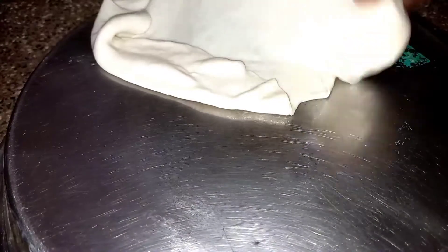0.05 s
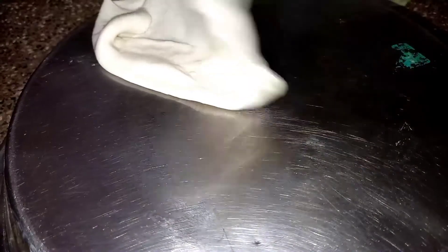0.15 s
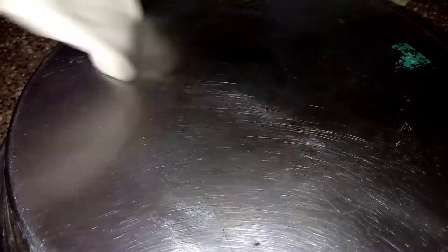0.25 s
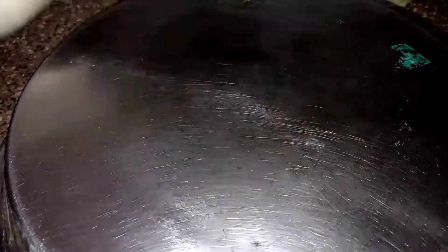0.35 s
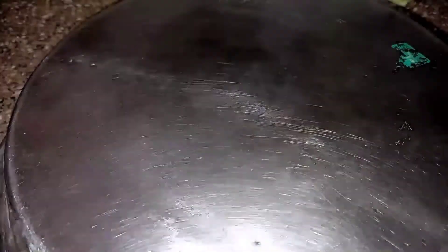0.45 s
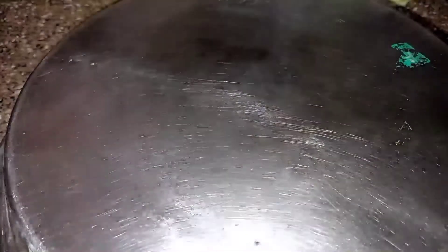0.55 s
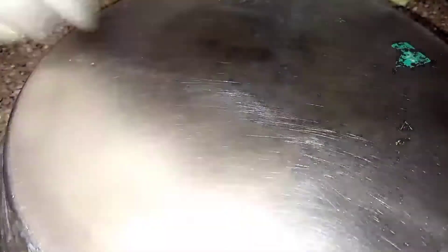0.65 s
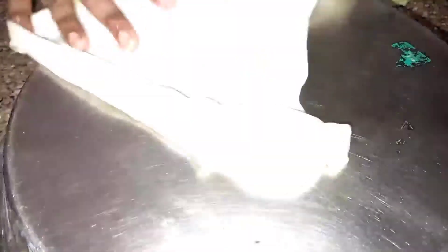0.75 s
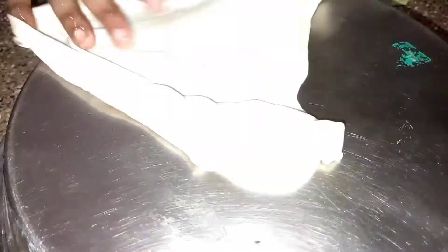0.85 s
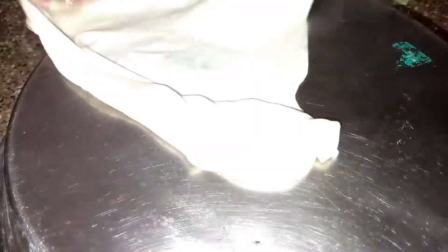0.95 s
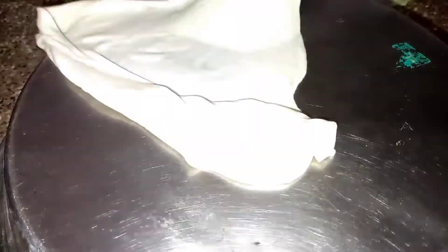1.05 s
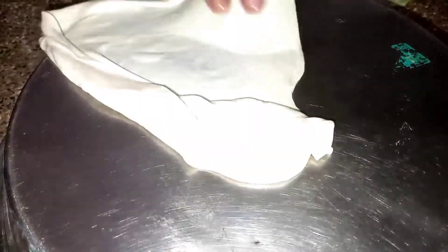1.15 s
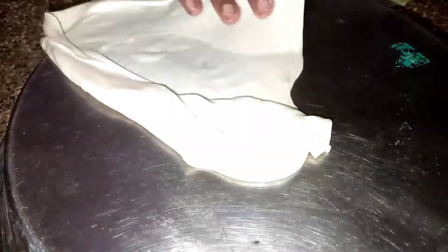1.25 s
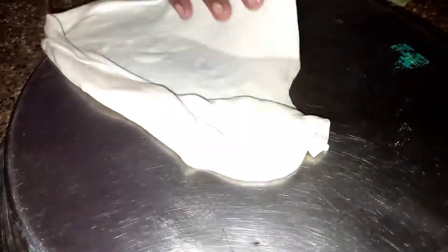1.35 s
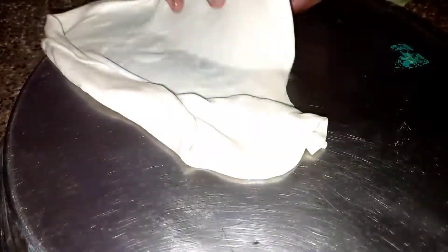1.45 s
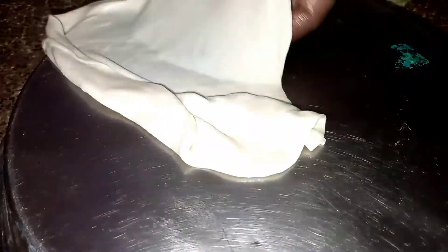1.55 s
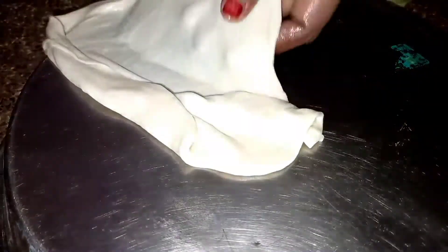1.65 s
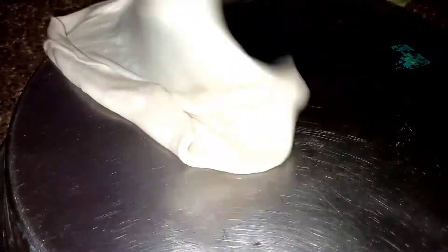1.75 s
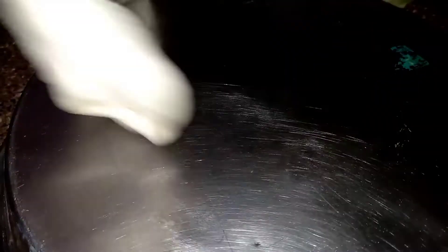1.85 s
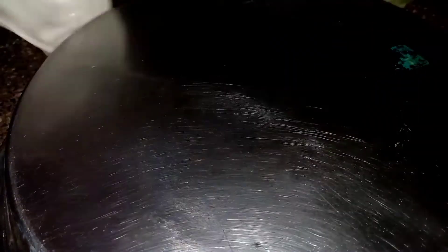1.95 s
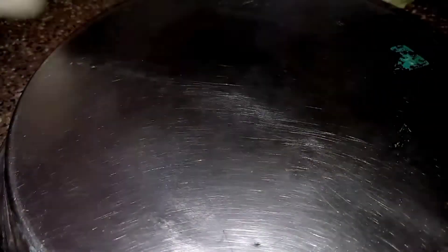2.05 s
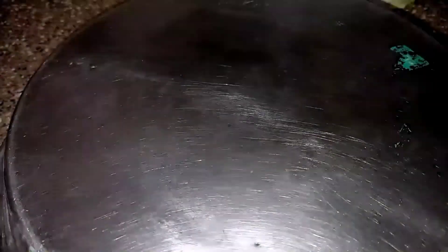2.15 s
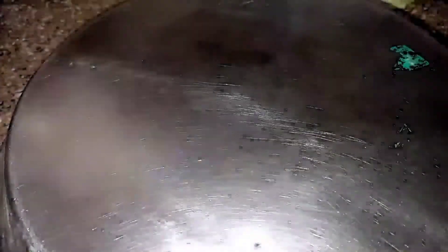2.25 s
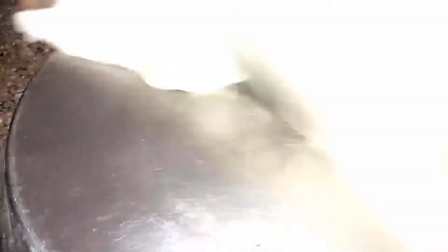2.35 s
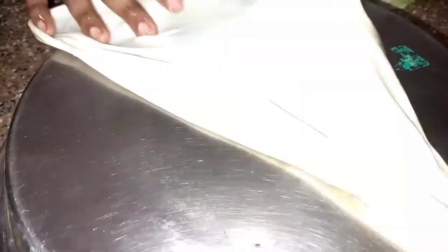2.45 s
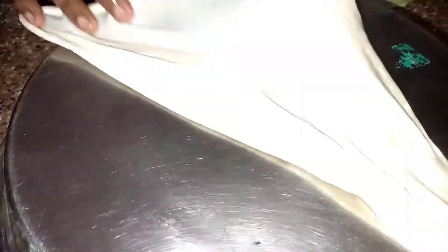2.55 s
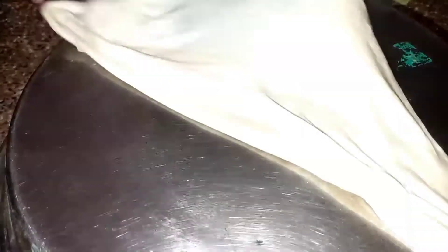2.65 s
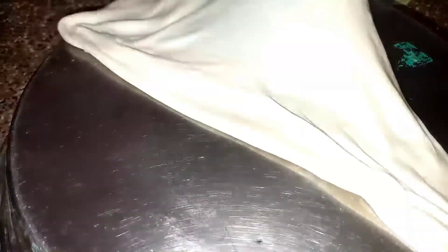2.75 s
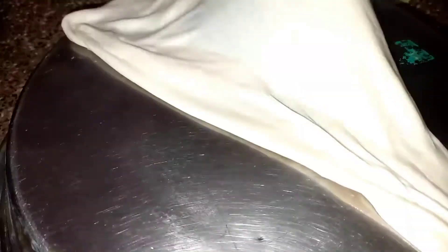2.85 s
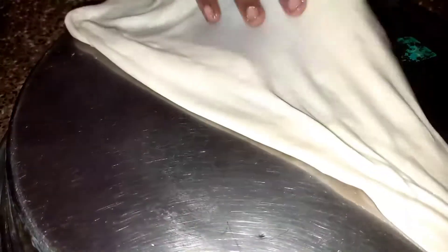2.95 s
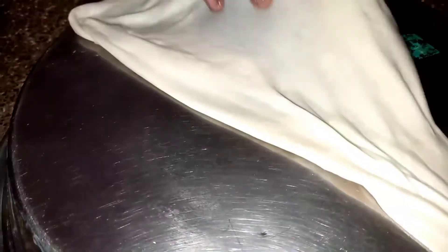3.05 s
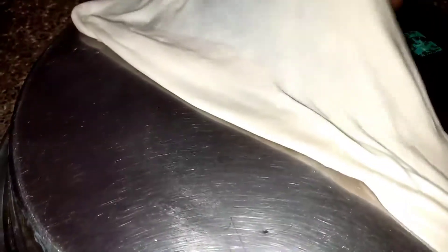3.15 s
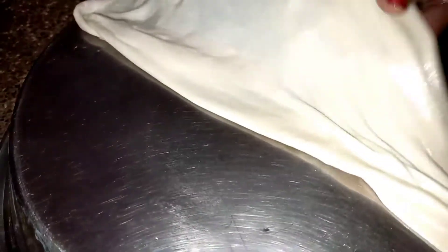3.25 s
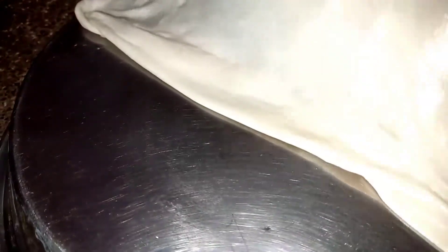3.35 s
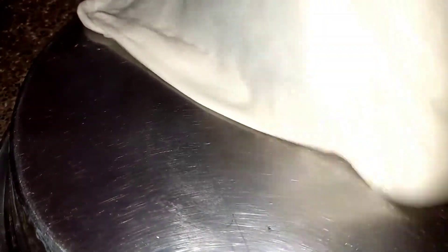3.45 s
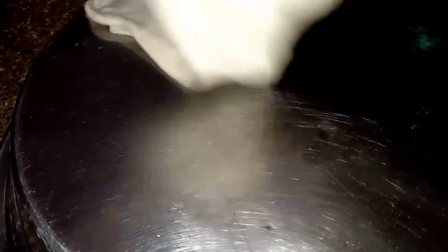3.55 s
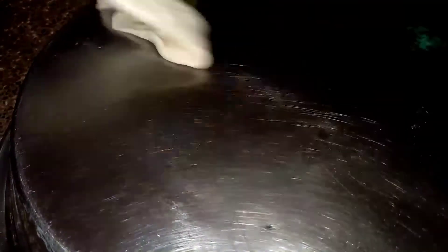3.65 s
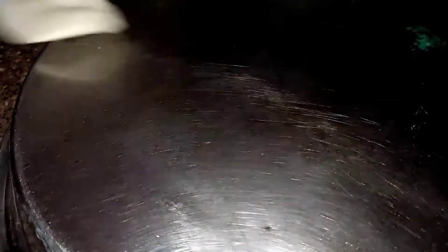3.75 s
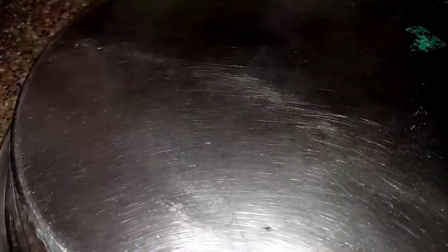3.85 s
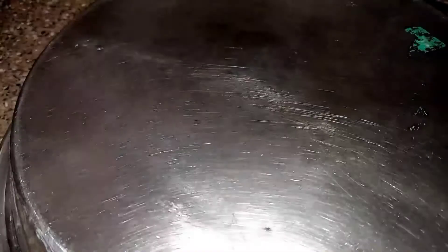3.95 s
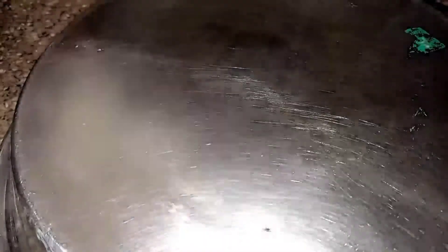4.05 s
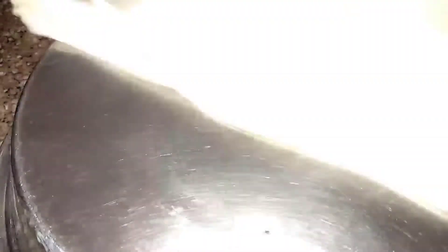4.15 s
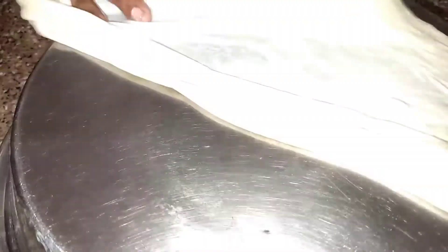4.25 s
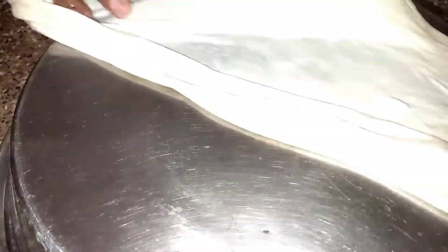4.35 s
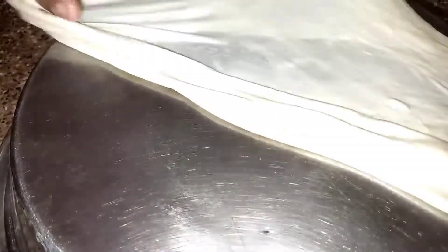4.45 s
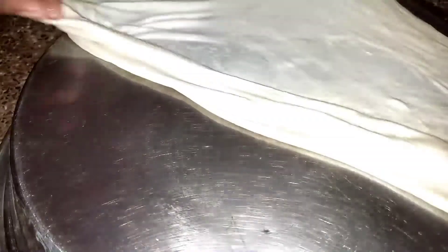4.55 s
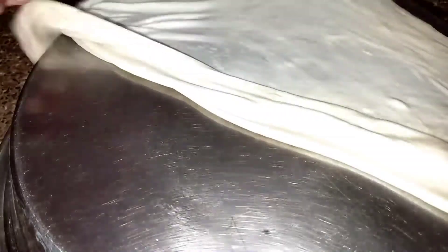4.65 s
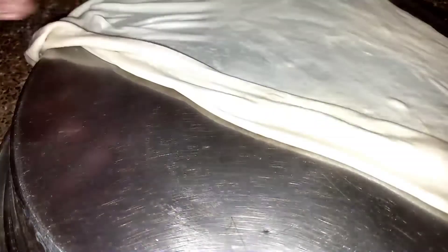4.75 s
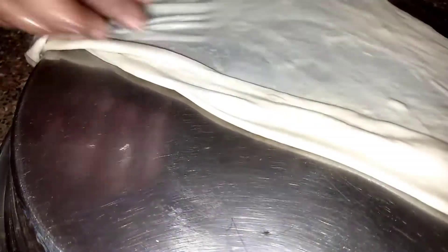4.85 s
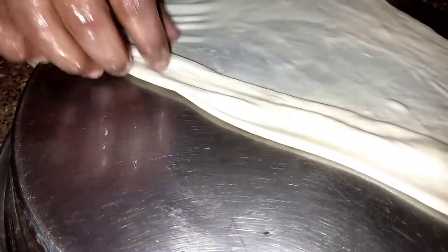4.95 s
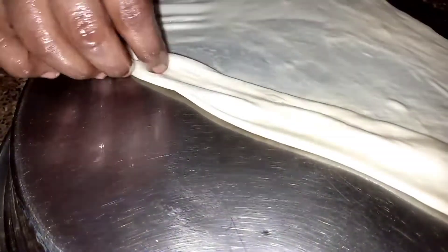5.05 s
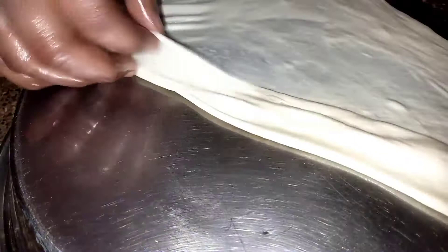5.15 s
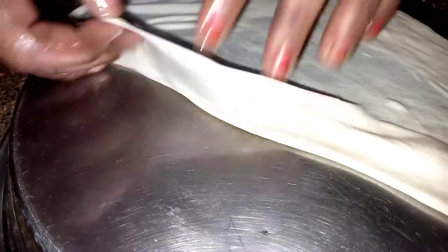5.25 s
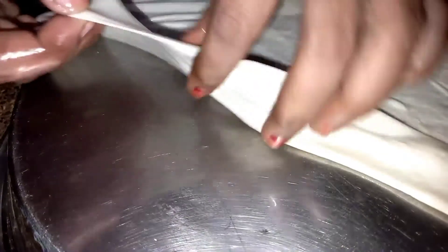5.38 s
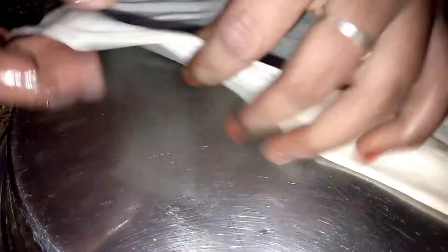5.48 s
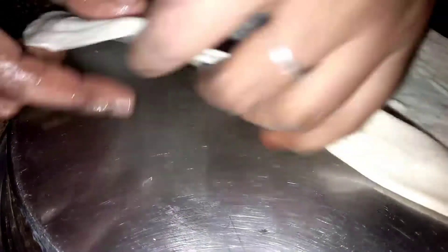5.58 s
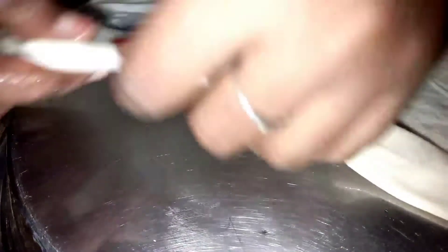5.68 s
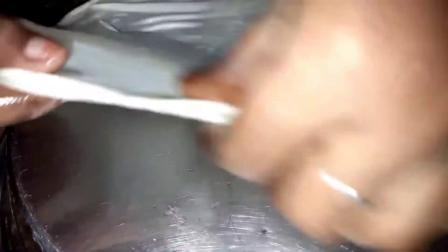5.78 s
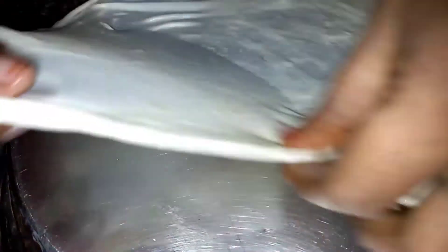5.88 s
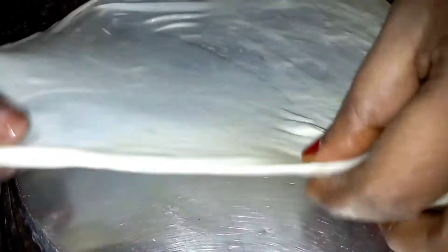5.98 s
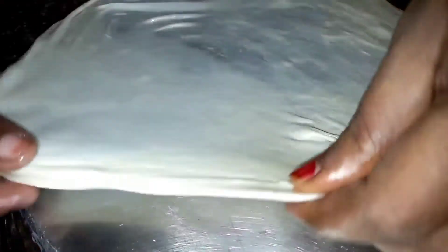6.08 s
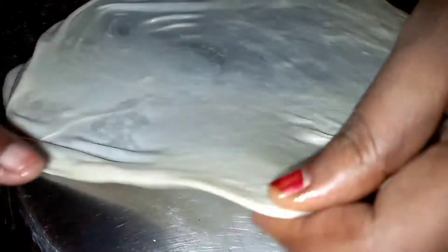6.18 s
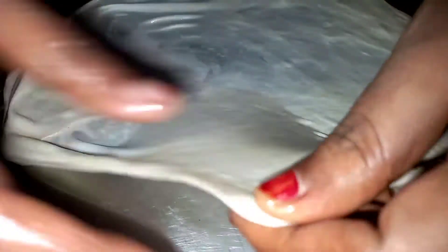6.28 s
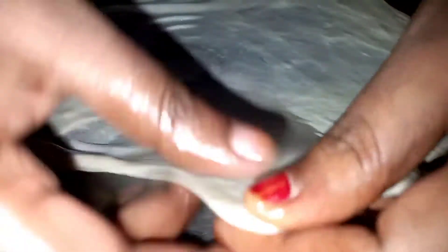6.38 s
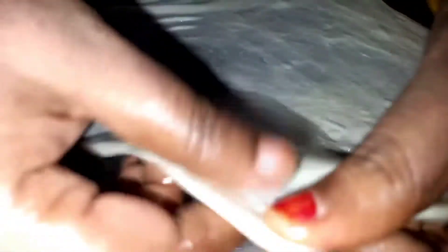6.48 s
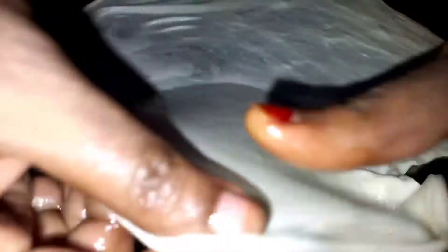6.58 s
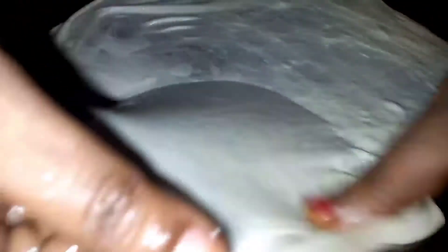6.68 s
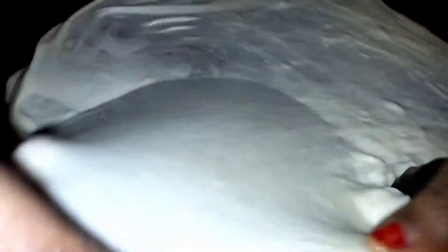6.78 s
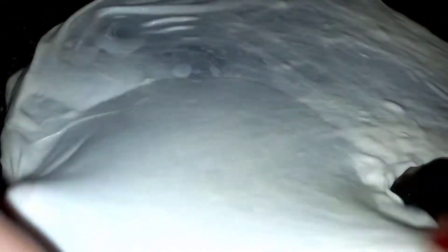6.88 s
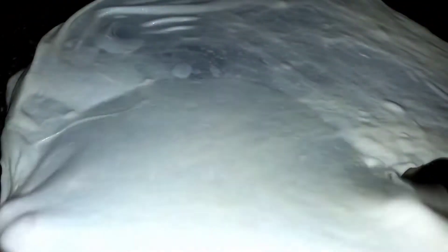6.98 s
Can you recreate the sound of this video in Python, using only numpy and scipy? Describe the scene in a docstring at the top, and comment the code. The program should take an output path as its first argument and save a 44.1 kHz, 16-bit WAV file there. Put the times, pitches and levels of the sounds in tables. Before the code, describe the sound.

Three wet dough slaps ring a steel plate with short clangs, bangles jingling before the later two, over faint motor hum and kitchen rush.

```python
"""Over motor hum (wavering sines) and kitchen rush (shaped noise), bangles clink (high modes, chopped ring).
An oily dough sheet slaps a steel plate near 0.7 s (plate modes plus wet noise bursts); its gusts thump
the left port (decaying low swings). Fingers tap; bangles jingle into the second slap near 2.3 s and
the third near 4.1 s. Weak taps and one small tick close it. Hard walls return a noise tail of the hits."""
import sys
import numpy as np
from scipy import signal
from scipy.fft import rfft, irfft
from scipy.io import wavfile
from scipy.ndimage import uniform_filter1d

SR = 44100
rng = np.random.default_rng(int(sys.argv[2]) if len(sys.argv) > 2 else 0)


def dump(signal):
    """Clip the signal to [-1, 1] and save it as 16-bit WAV at the path in sys.argv[1]."""
    limited = np.clip(np.atleast_2d(signal).T, -1, 1)
    pcm = np.round(limited * 32767).astype(np.int16)
    wavfile.write(sys.argv[1], SR, pcm)


N = 309582

# dough folds and fingers landing: t/s, plate ring peak level/dB before pan, wet smack gain/dB,
# left minus right/dB, contact rise/ms, ring length share, favoured f/Hz
LANDINGS = [(0.711, -14, -21, 1, 5.2, 1.6, 455), (0.723, -10.5, -9, 4, 0.43, 0.68, 496),
            (0.742, -2.5, -13.5, -1, 2.13, 0.81, 454), (.756, -17, -27, 12, 1.2, 0.94, 497),
            (0.811, -15, -44, 11, 0.87, 0.25, 337), (1.472, -19, -36.5, 1.5, 2.4, 0.61, 444),
            (1.505, -22, -34.5, 1.5, .9, .63, 567), (2.338, -18, -23.5, 3, 4.8, 0.83, 420),
            (2.348, -17, -20, -0.5, 3.9, 1.4, 520), (2.3882, -4.5, -7.5, 6, 0.97, 0.49, 466),
            (2.398, -2.5, -6, -4.5, 0.67, 0.33, 474), (2.411, -6.5, -8, 3, 0.34, 0.56, 626),
            (3.165, -20.5, -37, 2, 1, 0.67, 584), (4.144, -18, -25, 1.5, 3.8, 0.72, 464),
            (4.1676, -13, -7.5, 0, 0.54, 0.42, 520), (4.177, -12, -10, 10, 0.35, 0.67, 320),
            (4.188, -5, -2.5, -2, 0.16, 0.65, 444), (4.194, -4, -13, 1, 0.73, 0.35, 420),
            (4.211, -10, -24.5, 2, .86, 1.4, 452), (5.897, -25.5, -37, 1, 1.2, 1.65, 436),
            (6.133, -22, -36, 0, 2.3, 0.29, 476), (6.384, -27, -39.5, 0, 2.4, .32, 482),
            (6.430, -22.5, -49, 1, 3.3, 0.59, 260), (6.692, -30, -39, 2.2, 5.3, 2.5, 342)]


def blows():
    """Landings ring the plate; air squeezed from under the wet dough smacks."""
    out = np.zeros((2, N))
    for t_s, ring_db, smack_db, pan_db, rise_ms, sustain, spot_hz in LANDINGS:
        plate = plate_ring(smack_db - ring_db, rise_ms / 1000, sustain, spot_hz)
        add(out, t_s, pan(pan_db) * undb(ring_db) * plate)
        add(out, t_s, pan(pan_db) * wet_smack(smack_db, rise_ms))
    return out


# modes of the plate damped by dough: f/Hz, relative level/dB, base t60/s
PLATE_MODES = [(195, -14.5, .1), (299.5, -4, 0.084), (333, -5.5, 0.096), (436, 1.5, 0.071),
               (511, -1.5, 0.12), (579.2, -9, 0.27), (693, -10.5, 0.07), (872, 2, 0.049), (952, -5, 0.12),
               (1063, -3.5, 0.084), (1326, -8, 0.11), (1326, -9, 0.22), (1610, -10, 0.069),
               (1934, -17, 0.13), (1980, -19, 0.27), (2850, -22, 0.083)]
RING_TILT_DB_PER_OCT, TILT_PER_WET_DB = 0.45, 0.41  # flatter, wetter landings ring brighter


def plate_ring(wet_db, rise_s, sustain, spot_hz):
    """The landing spot drives modes near one pitch harder; dough damps the others sooner."""
    hz, db, t60_s = np.transpose(PLATE_MODES)
    near = np.exp(-(np.log2(hz / spot_hz) / .2) ** 2)
    modes = np.transpose([hz, db + 6 * near, t60_s * (0.86 + 0.52 * near)])
    tilt_db = RING_TILT_DB_PER_OCT + TILT_PER_WET_DB * wet_db
    return ring(modes, tilt_db, 1.5, max(rise_s, .001), 1100, sustain, .008, count=2)


SMACK_TREBLE_DB, TREBLE_DB_PER_SMACK_DB = -4, 2.0  # weaker smacks are duller
SMACK_T60_S, SMACK_T60_S_PER_RISE_MS = 0.023, 0.031  # slower landings squeeze air out for longer


def wet_smack(smack_db, rise_ms):
    """Squeezed-out air is a grainy noise burst in a middle and a treble band."""
    t = np.arange(SR // 8) / SR
    t60_s = SMACK_T60_S + SMACK_T60_S_PER_RISE_MS * rise_ms
    attack = np.minimum(t / max(rise_ms / 1000, 1 / SR), 1)
    grains = undb(2.5 * stepped(len(t), 32))
    burst = rng.standard_normal((2, len(t))) * grains * fade(t, t60_s) * attack
    treble_db = smack_db * TREBLE_DB_PER_SMACK_DB + SMACK_TREBLE_DB
    return undb(smack_db) * band(burst, 1180, 5120) + undb(treble_db) * band(burst, 7900, 12400)


# bangles knocking: t/s, level/dB before rattle and pan, ring length share
CLINK_EVENTS = [(0.3385, -26, 0.85), (0.3463, -36, .66), (.352, -41, .8), (1.585, -34.5, 1.8),
                (1.594, -38.5, 1.3), (1.785, -50, .55), (2.009, -45, 1.1), (2.271, -41, .5),
                (2.303, -30, 1.4), (2.319, -25, 1.4), (2.328, -21, 0.62), (2.334, -20, 0.63),
                (2.346, -25, 1.4), (4.066, -28.5, .87), (4.076, -34, 0.77), (4.087, -26, .45),
                (4.105, -37, 0.87)]
# modes of the bangles: f/Hz, relative level/dB, base t60/s
BANGLE_MODES = [(7050, -9, 0.071), (7490, -6.5, 0.046), (9700, -17, 0.056), (11600, -2.5, 0.2),
                (12300, -7, 0.04), (11900, -10, 0.13), (12340, 4, 0.056), (12800, -8, 0.12),
                (13800, -6, 0.066), (15000, -16, .03)]
CLINK_PAN_DB = 0.5


def clinks():
    """Thin rings knock: a crack, and a high jingle chopped as they keep touching."""
    out, t = np.zeros((2, N)), np.arange(SR // 5) / SR
    for t_s, db, sustain in CLINK_EVENTS:
        noise = rng.standard_normal((2, len(t))) * fade(t, 0.054)
        crack = undb(-10) * band(noise, 6000, 19845)
        rattle = undb(2.9 * uniform_filter1d(stepped(len(t), 100), 60))
        jingle = ring(BANGLE_MODES, 0, 4.2, 0.00065, 2990, sustain, 0.0163, count=3)
        add(out, t_s, pan(CLINK_PAN_DB) * undb(db) * (crack + rattle * jingle))
    return out


# small tick among the fingers: t/s, peak level/dB, modes (f/Hz, relative level/dB, base t60/s)
TICK_EVENT = (6.158, -39, [(4300, -1, .04), (4450, -4, .03)])


def tick():
    """A few short modes struck once."""
    out = np.zeros((2, N))
    t_s, db, modes = TICK_EVENT
    add(out, t_s, undb(db) * ring(modes, 0, 0, .0005, 2550, 0.58, 0, count=1))
    return out


# gusts on the ports: t/s, left level/dB, right level/dB, starting f/Hz, 1/e decay/s
PUFFS = [(0.798, 1, -34, 150, 0.0025), (.809, -4.5, -40, 83.4, 0.018), (0.852, -17.5, -48, 78, 0.024),
         (0.976, -27, -31, 83, 0.035), (2.332, -19, -32, 72.5, 0.034), (3.61, -30.5, -56, 81, 0.035),
         (4.192, -26.5, -33, 100.5, 0.06), (6.435, -23, -36, 152, 0.012)]


def gusts():
    """A puff of air pushes the membrane, which swings back with falling pitch."""
    out, t = np.zeros((2, N)), np.arange(SR // 4) / SR
    for t_s, left_db, right_db, hz, decay_s in PUFFS:
        swing = np.cos(2 * np.pi * hz * t * (1 - 0.89 * t))
        swing = swing * np.exp(-t / decay_s) * np.minimum(t / 0.0029, 1)
        add(out, t_s, undb([[left_db], [right_db]]) * swing)
    return out


# hum fundamental before flutter and pan: t/s, rms level/dB
HUM_LEVEL = [(.2, -61), (.37, -42), (.62, -41), (1.09, -47), (1.45, -49), (1.62, -72), (2.2, -62),
             (2.55, -46), (3.13, -41), (3.26, -55), (3.54, -70), (3.64, -40), (3.85, -71), (4.75, -59.5),
             (5.0, -45.5), (5.59, -70), (5.81, -36.5), (6.02, -35.5), (6.59, -46), (6.74, -55),
             (7.02, -41.5)]
# overtones: multiple of the fundamental, level re fundamental/dB
OVERTONES = [(2, -15), (4, -19.5)]
HUM_HZ, HUM_PAN_DB = 87.2, -1.4


def hum():
    """A motor tone with faint overtones, wavering in level and pitch."""
    phase = 2 * np.pi * np.cumsum(HUM_HZ * (1 + .005 * walk(3))) / SR
    tone = np.sin(phase)
    for multiple, db in OVERTONES:
        tone = tone + undb(db) * np.sin(multiple * phase)
    flutter = undb(.9 * walk(12))
    return np.sqrt(2) * tone * flutter * undb(curve(HUM_LEVEL)) * pan(HUM_PAN_DB)


# room rush, mean of the ports within the level band: t/s, rms level/dB
RUSH_LEVEL = [(0, -51), (.6, -46.5), (.95, -50.5), (3.5, -51), (3.85, -47), (4.65, -53), (5.5, -52.5),
              (6.0, -46), (7.02, -46)]
# colour of the rush: f/Hz, relative density level/dB
COLOUR = [(38, -23), (60, -15.5), (100, -12.5), (150, -15), (220, -11), (300, -13.5), (420, -19.5),
          (1100, -20.5), (1800, -27), (2500, -30), (3100, -34.5), (6500, -38), (8200, -44.5), (11000, -41),
          (14500, -52.5)]
# level band of the rush: low f/Hz, high f/Hz
LEVEL_BAND_HZ = (700, 7000)


def rush():
    """Diffuse coloured noise whose octave bands flicker independently."""
    spectra, hz = stereo_noise(size=N)
    spectra = spectra * undb(at(COLOUR, hz))
    out, octaves_hz = 0, 2. ** np.arange(6, 15)
    for k in range(len(octaves_hz)):
        out = out + irfft(spectra * share(hz, octaves_hz, k), N) * undb(0.91 * walk(3.725))
    rms = np.std(band(out.mean(axis=0), *LEVEL_BAND_HZ))
    return out / rms * undb(curve(RUSH_LEVEL))


# room tail by band: centre f/Hz, t60/s, level/dB
TAIL_BANDS = [(130, 0.54, -0.5), (260, 0.52, -5.5), (520, 0.49, -10.5), (1010, 0.54, -6),
              (2000, 0.51, -5.5), (3950, 0.52, -9.5), (8000, 0.4, -10.5), (14000, 0.35, -15)]


def room(dry):
    """Tiled walls return a dense tail, shorter in the top treble."""
    t, tail = np.arange(SR // 2) / SR, 0
    noise, hz = stereo_noise(size=len(t))
    centres_hz = np.array(TAIL_BANDS)[:, 0]
    for k, (_, t60_s, db) in enumerate(TAIL_BANDS):
        part = irfft(noise * share(hz, centres_hz, k), len(t))
        part = part * fade(t, t60_s) * np.minimum(t / 0.014, 1)
        tail = tail + undb(db) * part / np.sqrt(t60_s * SR / (2 * np.log(1000)))  # by decay energy
    return signal.fftconvolve(dry, tail, axes=1)[:, :N]


# likeness of the ports: f/Hz, left-right correlation
PORT_LIKENESS = [(60, 0.85), (150, 0.95), (300, 0.92), (640, 0.32), (1300, 0.0055)]


def stereo_noise(size):
    """Spectra of noise at two ports, alike in the bass only, and their frequencies."""
    hz = np.maximum(np.fft.rfftfreq(size, 1 / SR), 1)
    like = np.clip(at(PORT_LIKENESS, hz), 0, 1)
    mid, side = rfft(rng.standard_normal((2, size))) * np.sqrt([(1 + like) / 2, (1 - like) / 2])
    return np.array([mid + side, mid - side]), hz


def ring(modes, tilt_db, scatter_db, rise_s, port_hz, sustain, split, count):
    """One blow, peak 1: each mode a cluster of neighbours; port phases part with frequency."""
    hz, db, t60_s = np.repeat(np.array(modes, float), count, axis=0).T[:, :, None]
    t = np.arange(SR // 5) / SR
    level, detune, spread, start = rng.standard_normal((4, len(hz), 1))
    tilt = tilt_db * np.log2(hz / np.median(hz))  # tilt_db per octave
    gain = undb(db + tilt + scatter_db * level) * fade(t, t60_s * sustain)
    phase = 2 * np.pi * hz * (1 + split * detune) * t + .6 * start
    skew = spread * (hz / port_hz) ** 2
    both = np.array([np.sum(gain * np.sin(phase + side * skew), axis=0) for side in (1, -1)])
    both = both * (1 - np.exp(-t / rise_s))
    return both / np.abs(both).max()


def undb(db):
    """Decibels to gain."""
    return 10 ** (np.asarray(db) / 20)


def curve(table):
    """Level column of a time table, one value a sample."""
    t_s, level_db = np.transpose(table)
    return np.interp(np.arange(N) / SR, t_s, level_db)


def at(table, hz):
    """A spectrum table read on a log-frequency axis."""
    table_hz, value = np.transpose(table)
    return np.interp(np.log(hz), np.log(table_hz), value)


def share(hz, centres_hz, k):
    """Weight of band k among overlapping log-frequency bands that sum to one."""
    return np.interp(np.log(hz), np.log(centres_hz), np.arange(len(centres_hz)) == k)


def band(x, lo_hz, hi_hz):
    """Band-pass."""
    return signal.sosfilt(signal.butter(2, [lo_hz, hi_hz], "band", fs=SR, output="sos"), x)


def add(out, t_s, sound):
    """Mix a two-channel sound in at t_s."""
    i = int(t_s * SR)
    out[:, i:i + sound.shape[1]] += sound[:, :N - i]


def pan(db):
    """Port gains for a left-minus-right level."""
    return undb(np.array([[db], [-db]]) / 2)


def fade(t, t60_s):
    """Exponential decay, t60 at least 3 ms."""
    return np.exp(-np.log(1000) * t / np.maximum(t60_s, .003))


def stepped(size, hold):
    """Random values, each held for some samples."""
    return np.repeat(rng.standard_normal(size // hold + 1), hold)[:size]


def walk(rate_hz):
    """Slow random curve, spread near 1."""
    k = int(SR / rate_hz)
    steps = np.repeat(rng.standard_normal(N // k + 1), k)
    return 1.24 * uniform_filter1d(uniform_filter1d(steps, k), k)[:N]


def scene():
    """Hits in the room over gusts, hum and rush."""
    hits = blows() + clinks() + tick()
    return hits + room(hits) + gusts() + hum() + rush()


TOP_HZ = 15700


def record(dry):
    """The recorder drops the deep bass, rounds the loudest peaks and cuts the top."""
    x = signal.sosfilt(signal.butter(2, 45, "high", fs=SR, output="sos"), dry)
    x = x / (1 + np.abs(x / .92) ** 4) ** .25
    return signal.sosfilt(signal.ellip(8, .2, 70, TOP_HZ, fs=SR, output="sos"), x)


dry = scene()
out = record(dry)
dump(out)
```